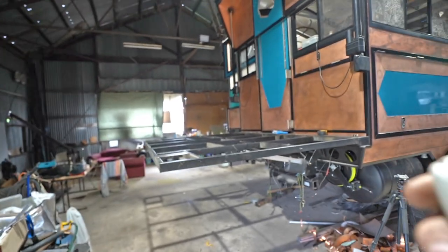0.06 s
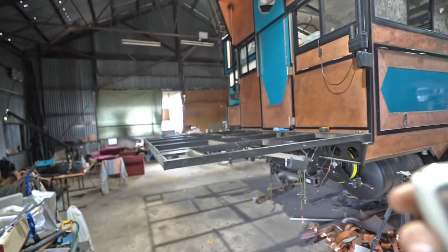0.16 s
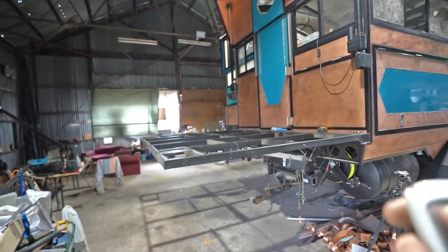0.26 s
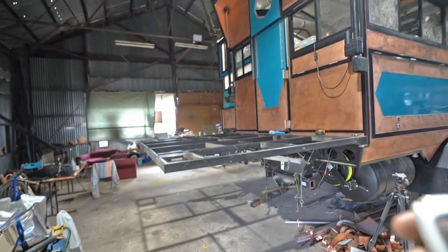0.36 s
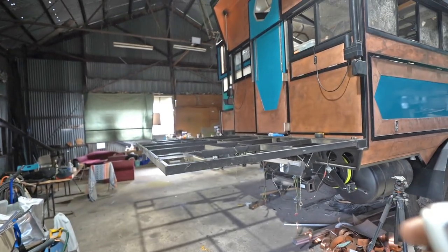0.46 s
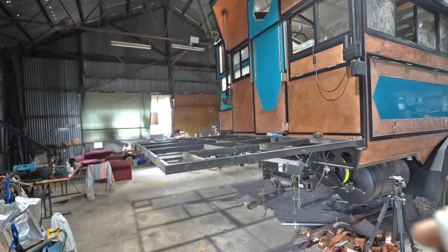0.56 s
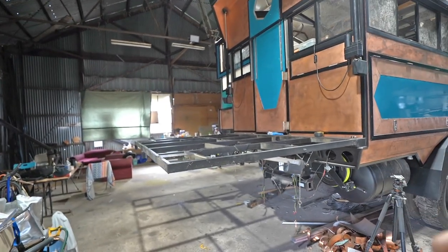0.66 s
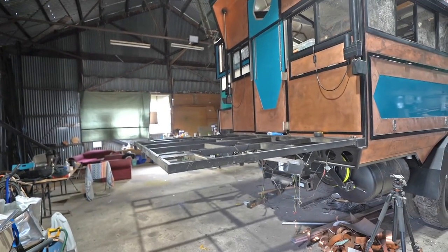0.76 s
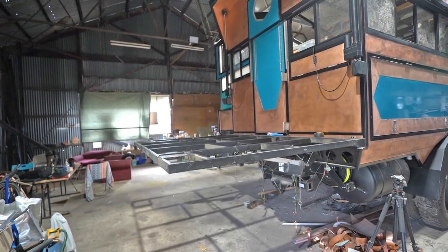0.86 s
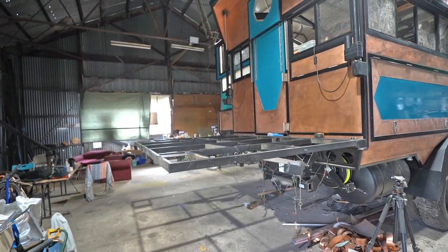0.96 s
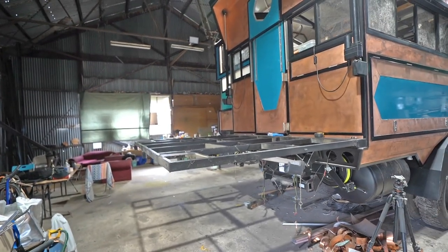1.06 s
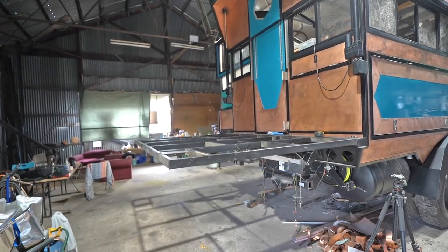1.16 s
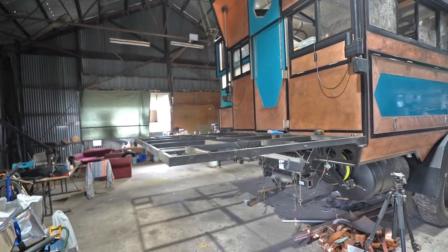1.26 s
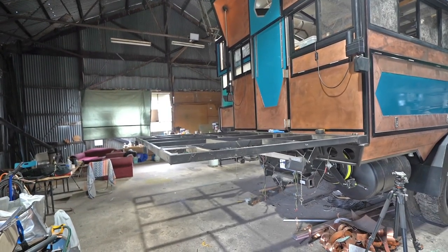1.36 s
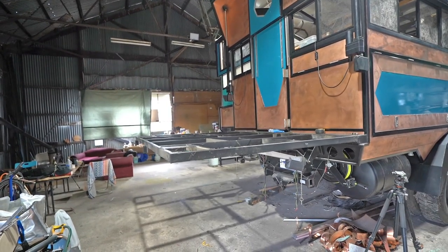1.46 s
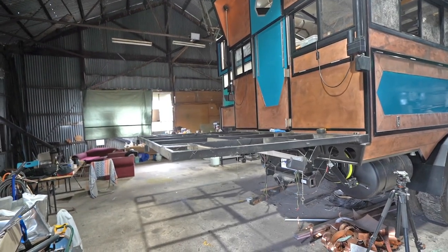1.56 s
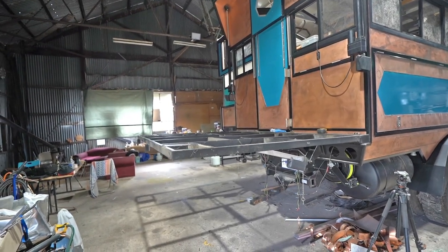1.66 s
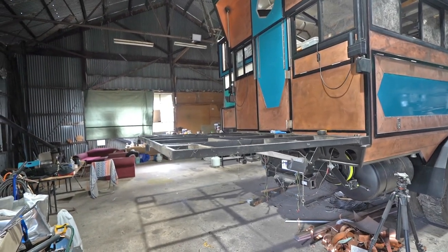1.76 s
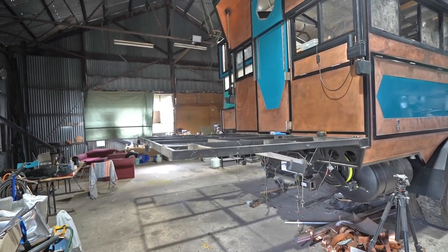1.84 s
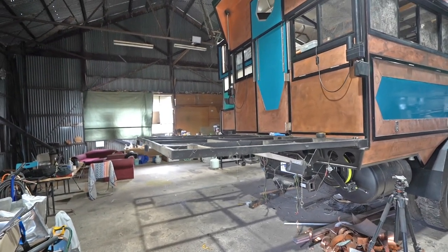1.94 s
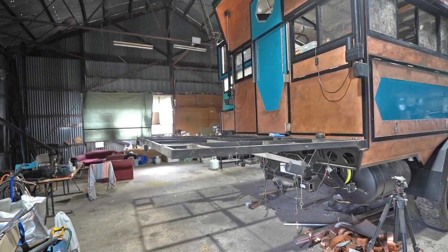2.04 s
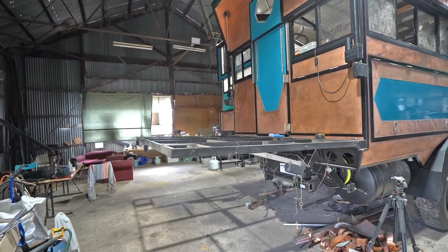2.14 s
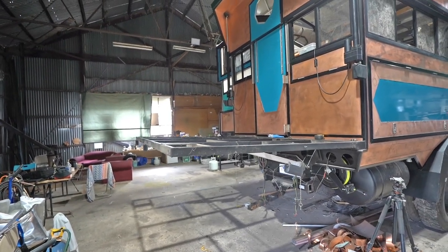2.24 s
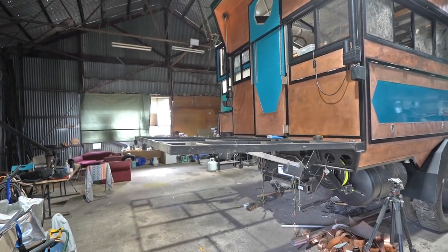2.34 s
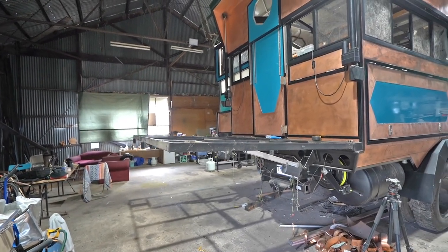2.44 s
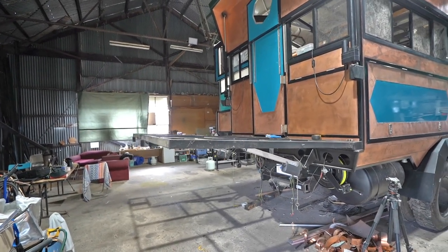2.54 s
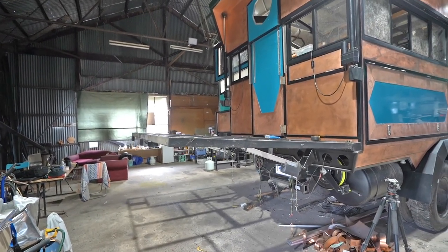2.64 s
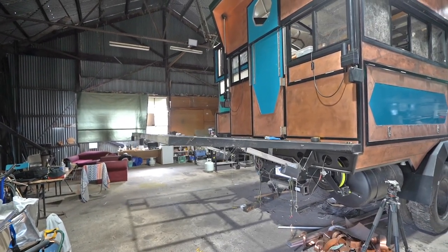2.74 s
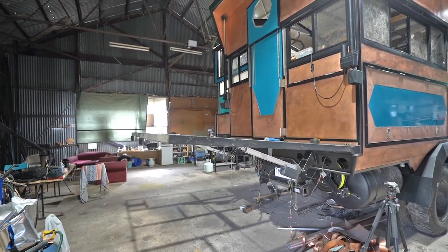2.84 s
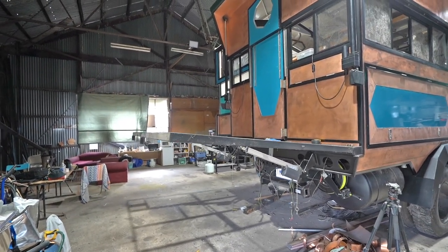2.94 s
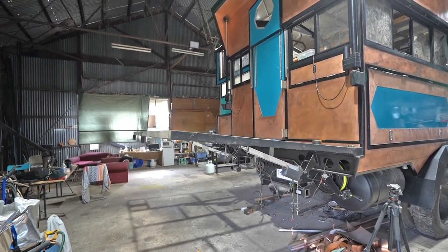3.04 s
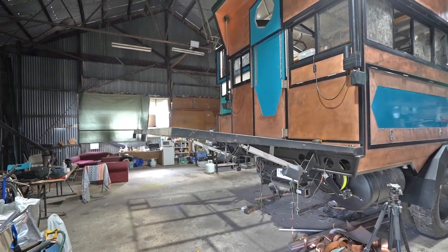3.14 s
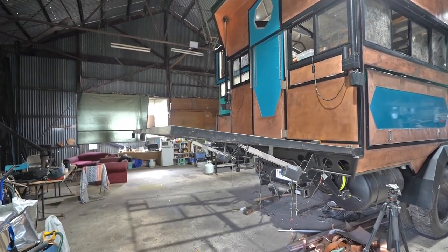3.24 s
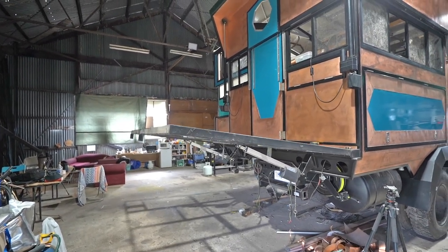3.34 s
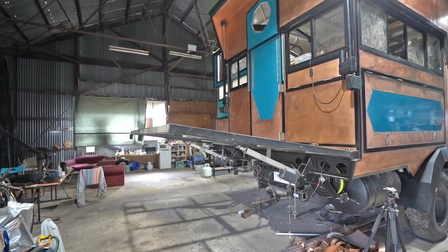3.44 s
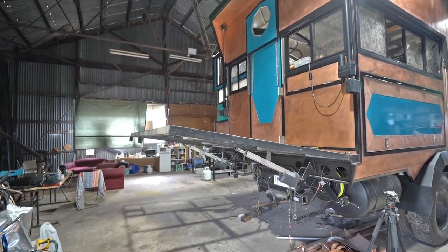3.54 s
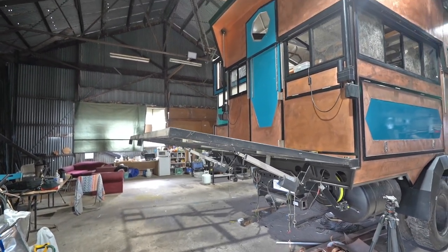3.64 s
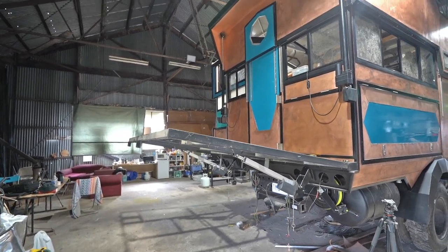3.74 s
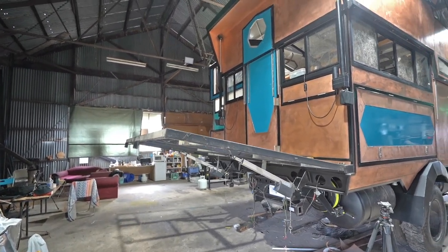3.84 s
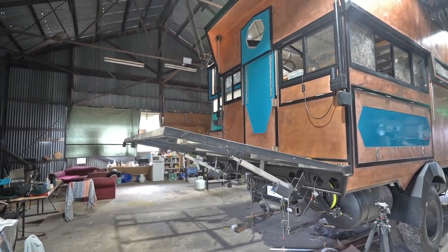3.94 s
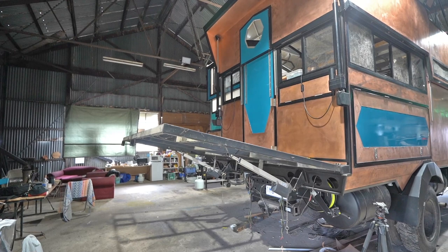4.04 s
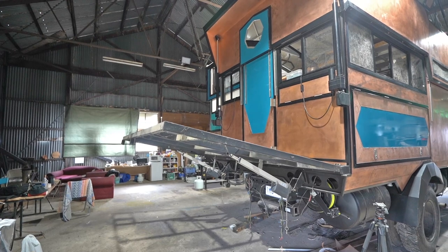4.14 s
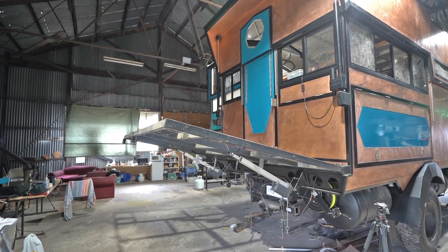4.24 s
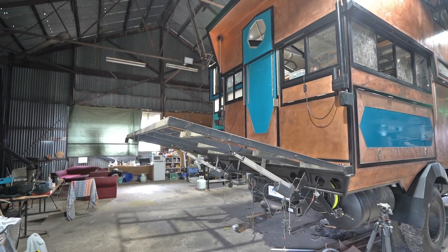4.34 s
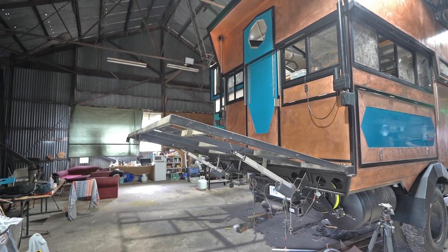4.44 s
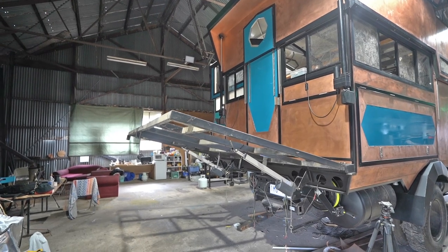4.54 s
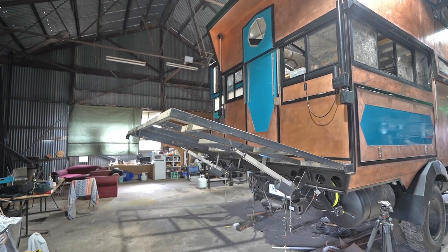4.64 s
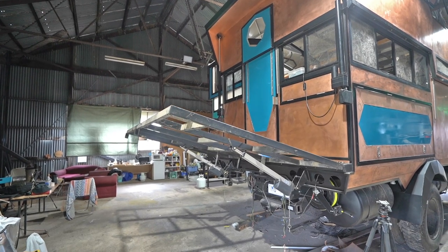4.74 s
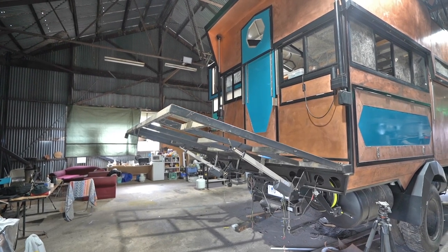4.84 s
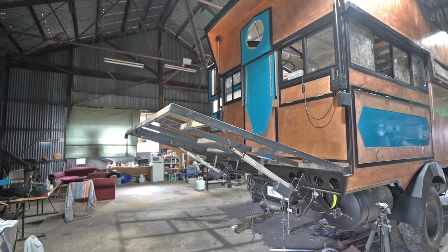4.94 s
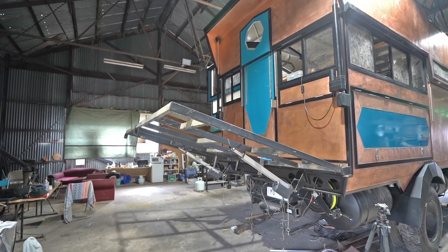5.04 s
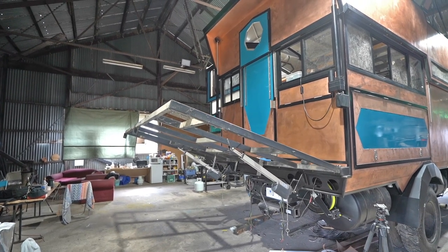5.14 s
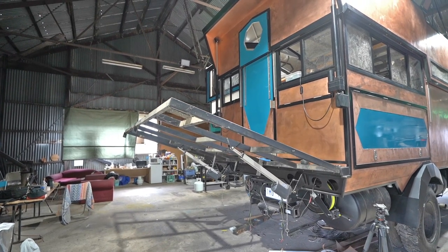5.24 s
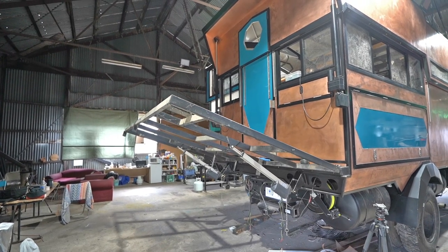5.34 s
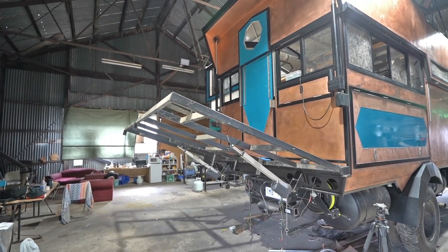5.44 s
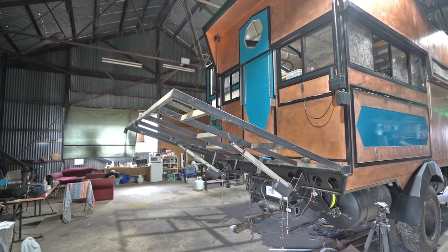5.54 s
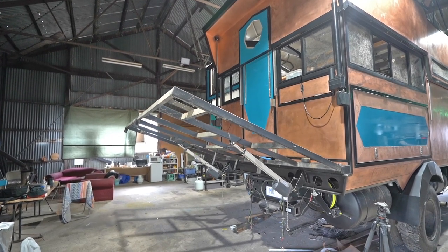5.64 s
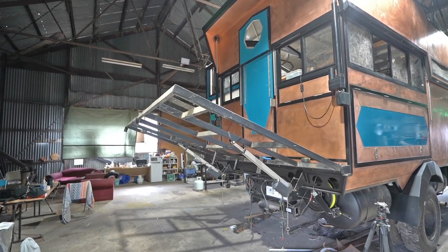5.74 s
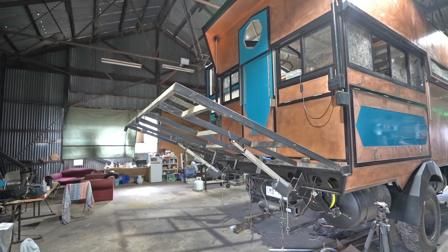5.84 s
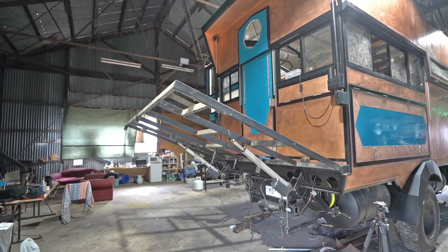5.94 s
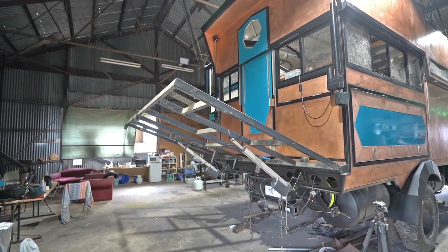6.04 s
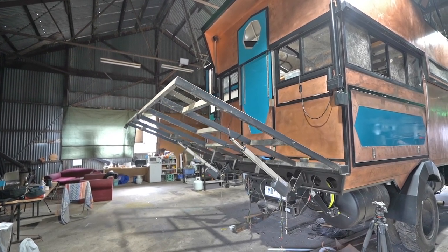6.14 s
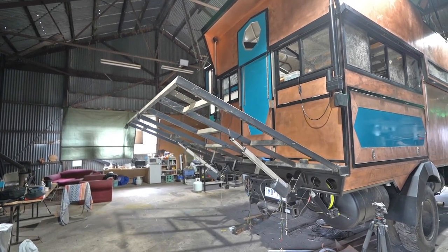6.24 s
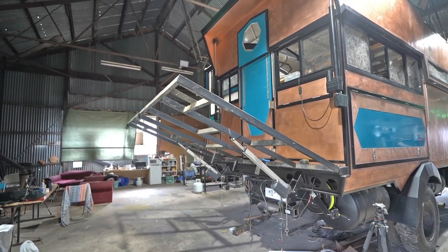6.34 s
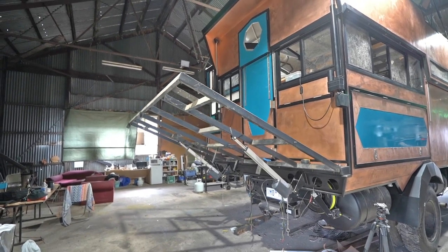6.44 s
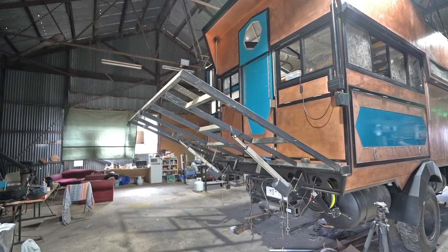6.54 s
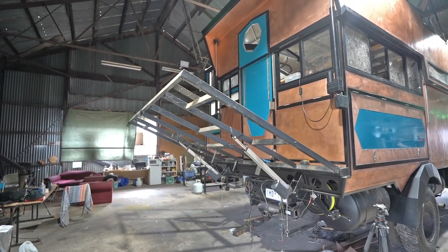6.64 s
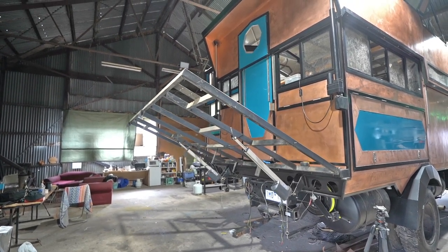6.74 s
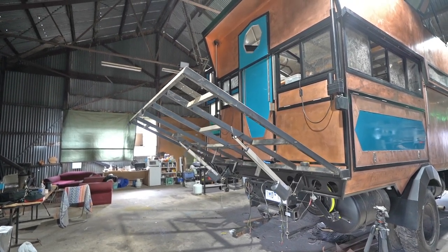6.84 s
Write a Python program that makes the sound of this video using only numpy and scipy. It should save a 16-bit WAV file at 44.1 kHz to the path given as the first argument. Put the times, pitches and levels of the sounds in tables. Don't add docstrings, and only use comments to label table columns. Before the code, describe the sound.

A reverberant tin shed, heard through a band-limited camera microphone. It opens with soft air hush, faint low hum, a distant drone and deep wind rumble; skin rustles lightly on plastic until about 0.5 s. At 0.63 s a sharp button click stands out, followed by tiny snaps at 0.73-0.77, a ringing relay closure at 0.79 and a low knock at 0.85. Two electric screw actuators start immediately, jolting unevenly as their pitch climbs to a steady gear whine near 1.4 s, with dense harmonics, slow beating and brushy rasp. At about 2.25 s playback abruptly doubles in speed: the whine leaps an octave, brighter and throbbing faster, continuing with small swells of effort to the cut at about 6.9 s. Soft low thuds fall near 4.4, 4.5 and 4.7 s, with a fainter one at 6.6. From 4.9 s a faint outside engine sinks in pitch; wind dips, then gusts near 6 s.

```python
import sys
import numpy as np
from scipy import signal
from scipy.fft import rfft, irfft, next_fast_len
from scipy.io import wavfile
from scipy.ndimage import uniform_filter1d, map_coordinates

SR = 44100
rng = np.random.default_rng(int(sys.argv[2]) if len(sys.argv) > 2 else 0)


def unload_wav(signal):
    wavfile.write(
        sys.argv[1],
        SR,
        np.round(np.clip(np.atleast_2d(signal).T, -1, 1) * 32767).astype(np.int16),
    )


def natural_amplitude(level_db):
    exponent = np.asarray(level_db, float) / 20
    return 10 ** exponent


N = 303628

FAST_FROM = 2.245
CUT = round(FAST_FROM * SR)
M = CUT + 2 * (N - CUT)
LIVE = np.arange(M) / SR
SHOWN = np.minimum(LIVE, (LIVE + FAST_FROM) / 2)
TEETH = 106
RATIO = 3


def unit(x):
    return x / np.sqrt(np.mean(x ** 2) + 1e-20)


def along(points, hz):
    f, v = np.transpose(points)
    return np.interp(np.log(hz + 1), np.log(f + 1), v)


def curves(rows):
    s, *cols = np.transpose(rows)
    return [np.interp(SHOWN, s, c) for c in cols]


def wobble(rate):
    return map_coordinates(rng.standard_normal(400), [LIVE * rate], mode="wrap")


def filtered(x, response):
    m = next_fast_len(M + SR // 2)
    return irfft(rfft(x, m) * response(np.fft.rfftfreq(m, 1 / SR)), m)[:M]


def noise(spectrum):
    return unit(filtered(rng.standard_normal(M), lambda hz: natural_amplitude(along(spectrum, hz))))


def place(s):
    return round(max(s, 2 * s - FAST_FROM) * SR)


# (frequency [Hz], level [dB per Hz])
SHED_AIR = [(60, -13), (110, -9.5), (170, -15), (235, -9), (320, -14), (500, -15), (900, -19.5),
            (2000, -32), (6500, -43), (10000, -48.5), (16000, -59)]
# (frequency [Hz], level [dB per Hz])
DRONE = [(25, -40), (45, 1), (60, 2.5), (105, -0.5), (140, -21), (300, -50), (900, -120)]


def room_tone():
    hush_db = -46.5 + 0.24 * SHOWN + 1.4 * wobble(4.6)
    drone_db = -61.5 + 0.94 * SHOWN + 2.4 * wobble(0.84)
    hum = natural_amplitude(-42.5 + 0.2 * wobble(2.16)) * np.sin(2 * np.pi * 93.1 * LIVE)
    return hum + natural_amplitude(drone_db + 3.5) * noise(DRONE) + natural_amplitude(hush_db) * noise(SHED_AIR)


# (time [s], level [dB], half length [s])
GUSTS = [
    (3.9, -5, 0.13),
    (5.6, -4, .2),
    (5.95, 3, .2),
]
# (frequency [Hz], level [dB per Hz])
RUMBLE = [(4, -8), (10, -2), (20, -2), (32, -12.5), (60, -60), (200, -130)]


def buffeting():
    level_db = np.where(LIVE < FAST_FROM, -37 - 2 * LIVE, -42)
    for s, db, half in GUSTS:
        level_db = level_db + db * np.exp(-((SHOWN - s) / half) ** 2)
    return natural_amplitude(level_db - 2.5) * unit(natural_amplitude(1.5 * wobble(6)) * noise(RUMBLE))


# (time [s], level [dB], half length [s])
STIRS = [
    (.02, -56.5, .05),
    (.3, -61, .07),
    (.43, -65, .07),
]
# (frequency [Hz], level [dB per Hz])
RUSTLE = [(300, -22), (1500, -1), (2700, 1), (5000, -4), (8000, -8), (14000, -30)]


def hand():
    stir = sum(natural_amplitude(db) * np.exp(-((LIVE - s) / half) ** 2) for s, db, half in STIRS)
    return stir * natural_amplitude(2.5 * wobble(29)) * noise(RUSTLE)


# (time [s], peak level [dB], ring [Hz], t60 [s], snap [dB])
CLICKS = [
    (0.625, -7.5, 1390, 0.005, -30),
    (.6252, -28, 4200, .006, -24),
    (.7268, -41, 4000, 0.0055, 14),
    (.7715, -38, 3600, 0.0087, 5),
    (.7717, -31, 7400, 0.0072, -8),
    (.785, -17, 2420, 0.034, -35),
    (.7855, -21, 8170, .02, -17),
    (.7855, -44, 4470, .02, -13),
    (.853, -13, 910, .04, -18),
]


def clicks():
    out, t = np.zeros(M + SR), np.arange(SR // 2) / SR
    for s, db, hz, t60, snap_db in CLICKS:
        ring = np.sin(2 * np.pi * hz * t) + natural_amplitude(snap_db) * rng.standard_normal(len(t))
        attack = (1 - np.exp(-8 * t / t60)) ** 2
        out[place(s):][:len(t)] += natural_amplitude(db - 60 * t / t60) * attack * ring
    return out[:M]


RELAY_S = 0.785
# (time [s], rate [turns per s])
CRUISE = [(1.6, 4.937), (3.05, 4.947), (4.05, 4.935), (4.55, 4.917), (6.9, 4.921)]


def speed():
    cruise, = curves(CRUISE)
    ramp = 1.95 + 5.45 * np.clip(LIVE - RELAY_S, 0, 1)
    knee = 30
    rate = (ramp ** -knee + cruise ** -knee) ** (-1 / knee)
    return rate, 20 * np.log10(rate / cruise)


# (time [s], level [dB])
EFFORT = [(1.2, -1.5), (1.9, 0), (2.7, 0), (3.2, 1), (3.75, -1), (4.3, 1.1), (4.7, 0), (5, 1.6), (5.5, -1),
          (6.2, 0), (6.88, -1.6)]
# (time [s], whine gain [dB], rasp gain [dB], fade [s])
JOLTS = [
    (.785, -11, 0.5, 0.024),
    (.852, -1, 15, 0.03),
    (.95, 5, 1.5, .04),
    (1.05, 5, 3, 0.063),
    (1.135, 2.5, -0.5, 0.085),
]


def levels(lag_db):
    effort_db, = curves(EFFORT)
    whine_db = -17.5 + 1.36 * lag_db + effort_db
    rasp_db = -14.5 + 1.7 * lag_db + 0.5 * effort_db
    for s, whine_jump, rasp_jump, fade in JOLTS:
        kick = np.clip((LIVE - s) / 0.0056, 0, 1) * np.exp(-np.clip(LIVE - s, 0, 1) / fade)
        whine_db = whine_db + whine_jump * kick
        rasp_db = rasp_db + rasp_jump * kick
    return whine_db, rasp_db


ORDERS_SUNG = [60, 96, 102, 105, 315, 108, 111, 117, 189, 207, 43.6, 358, 426]
# (level [dB], drift [dB per s], beat depth [dB], loudest at [s], beat length [s])
SUNG = [(-30, -0.55, 2.5, 3.68, 2.97), (-31.5, -0.3, -0.2, 5.1, 4.6), (-21, -0.86, 1.5, 1.7, 3.8),
        (-26.5, 0.02, 2, 1.8, 1.72), (-36, -0.56, 2, 2.8, 1.55), (-28.5, -0.35, 2.5, 2.9, 1.8),
        (-36.5, 1.45, 2, 5.3, 5.2), (-32.5, -0.16, 3, 2.6, 3.4), (-33, -0.17, 3.5, 1.6, 5.2),
        (-20, -2.1, 1, 2.94, 1.87), (-47.5, 0.64, -1.5, 5.35, 1.2), (-39, -2.1, 16, 3.4, 2.6),
        (-47, 3, 1.5, 6.5, 2.4)]


def lines(turns, lag_db):
    out = np.zeros(M)
    for order, (db, drift, depth, s, length) in zip(ORDERS_SUNG, SUNG):
        beat_db = depth * np.cos(2 * np.pi * (SHOWN - s) / length)
        level_db = db + drift * SHOWN + beat_db + 1.8 * lag_db + 1.3 * wobble(3)
        cycles = order * turns + rng.random() + 0.033 * wobble(4.6)
        out += natural_amplitude(level_db) * np.sin(2 * np.pi * cycles)
    return out


# (harmonic [x tooth rate], level [dB], sideband spread [wheel orders])
MESH = [(.99, -2, 8), (1.55, -13.5, 6), (1.77, -11, 7), (2, -5.5, 9), (2.96, -6.5, 9), (3.38, -13.5, 4),
        (3.96, -11, 11), (5, -14, 13), (6, -14.5, 16), (7, -15, 15), (8, -18, 15), (9, -16, 15),
        (10, -25, 10), (12, -32, 18), (13, -24, 18)]
# (frequency [Hz], level [dB])
FRAME = [(100, -30), (200, -22), (300, -2.5), (450, -0.5), (700, -2), (900, 0.5), (1250, -1), (1400, -3),
         (2000, 0.5), (3400, 3), (9000, -8.5)]


def whine(turns, pinion_db, loose):
    order = np.arange(2049)
    hump = sum(natural_amplitude(db) / (1 + ((order - h * TEETH) / spread) ** 2) for h, db, spread in MESH)
    hump = hump * natural_amplitude(pinion_db * (order % RATIO == 0))
    kept = hump * ~np.isin(order, ORDERS_SUNG)
    drift = 2 * np.pi * (0.063 * LIVE + 0.082 * wobble(0.44))
    size = 16384
    repeating = np.zeros(M)
    for share in np.cos(drift), np.sin(drift):
        phase = np.exp(2j * np.pi * rng.random(2049))
        errors = irfft(kept * phase * natural_amplitude(1.96 * rng.standard_normal(2049)), size)
        repeating += share * np.interp(turns % 1 * size, np.arange(size + 1), np.append(errors, errors[0]))
    fine = np.arange(64 * 2048 + 1)
    smooth = np.interp(fine / 64, order, uniform_filter1d(hump, size=3))
    free = irfft(smooth * np.exp(2j * np.pi * rng.random(len(fine))), 64 * size)
    out = unit(repeating) + loose * np.interp(turns * size, np.arange(len(free)), unit(free))
    return unit(filtered(out, lambda hz: natural_amplitude(along(FRAME, hz))))


# (frequency [Hz], level [dB per Hz])
RASP = [(60, -36), (120, -35), (200, -22), (400, -18.5), (520, -7), (720, -16.5), (1030, -10), (1340, -18),
        (1750, -15.5), (3240, -17.5), (4800, -23), (5500, -29), (10500, -51.5), (16000, -64)]
# (frequency [Hz], width [Hz], level [dB])
HOUSING = [(292, 90, 3), (3420, 97, 1.5), (7570, 440, -1), (7920, 620, 2.5), (8570, 1200, 10.5),
           (12050, 520, 6), (13100, 860, 12), (15100, 900, 8)]


def rasp(turns, throb_db, gate, grit):
    pinion_swell = throb_db * np.cos(2 * np.pi * RATIO * turns + 1.74)
    wheel_swell = 0.13 * np.cos(2 * np.pi * turns + 0.48)
    swell = pinion_swell + wheel_swell + 0.96 * wobble(25)
    teeth = 1 + gate * np.cos(2 * np.pi * TEETH * turns)
    grains_db = grit * rng.standard_normal(M // 40 + 1).repeat(40)[:M]
    rough = rng.standard_normal(M) * natural_amplitude(grains_db)

    def colour(f):
        ring = 1 + sum(natural_amplitude(db) / (1 + ((f - c) / w * 2) ** 2) for c, w, db in HOUSING)
        return natural_amplitude(along(RASP, f)) * ring

    def bright(f):
        return f ** 2 / (f ** 2 + 2500 ** 2)

    top = filtered(rough * teeth * natural_amplitude(swell), lambda f: colour(f) * np.sqrt(bright(f)))
    low = filtered(rng.standard_normal(M), lambda f: colour(f) * np.sqrt(1 - bright(f)))
    return unit(top + low)


def actuators():
    strain = 1 + 4 * np.clip((1.4 - LIVE) / .5, 0, 1)
    rate, lag_db = speed()
    turns = np.cumsum(rate) / SR + 0.227 * (LIVE > FAST_FROM)
    twist = strain * (0.00048 * wobble(9) + 0.00015 * wobble(30))
    off_centre = 0.00046 * np.sin(2 * np.pi * turns)
    twisted = turns + twist + off_centre
    whine_db, rasp_db = levels(lag_db)
    screw_swell = 2 * np.cos(2 * np.pi * 4.78 * (LIVE - 6.16))
    pinion_swell = 1.16 * np.cos(2 * np.pi * RATIO * turns + 2.63)
    surge = 0.78 * wobble(5) + screw_swell + pinion_swell
    on = np.clip((LIVE - RELAY_S) / 0.0023, 0, 1)
    gears = natural_amplitude(whine_db - 4.0 + surge) * whine(twisted, pinion_db=4.5, loose=0.93)
    throb_db = 2.6 + 0.48 * SHOWN
    rub = natural_amplitude(rasp_db - 6.5) * rasp(turns, throb_db, gate=0.13, grit=0.92)
    tones = natural_amplitude(whine_db + 17.0) * lines(twisted, lag_db)
    return on * tones, on * (gears + rub)


# (frequency [Hz], t60 [s])
SHED = [(200, 1.78), (2000, 0.55), (10000, 1.09)]


def shed(x):
    hz, t, z = signal.stft(rng.standard_normal(SR), SR, nperseg=256)
    tail = signal.istft(z * natural_amplitude(-60 * t / along(SHED, hz)[:, None]), SR, nperseg=256)[1]
    return signal.fftconvolve(np.pad(x, (500, 0)), tail / np.linalg.norm(tail))[:M]


# (time [s], level [dB], boom [Hz], t60 [s])
THUDS = [
    (4.366, -26.5, 102, 0.91),
    (4.49, -33.5, 128, 0.95),
    (4.719, -30, 39.4, 1),
    (6.63, -36, 66, 0.78),
]


def thuds():
    out, t = np.zeros(M + SR), np.arange(SR // 2) / SR
    for s, db, hz, t60 in THUDS:
        puff = uniform_filter1d(uniform_filter1d(rng.standard_normal(len(t)), size=90), size=60)
        body = 0.5 * np.sin(2 * np.pi * hz * t) + 0.81 * unit(puff)
        out[place(s):][:len(t)] += natural_amplitude(db - 60 * t / t60) * (1 - np.exp(-t / 0.014)) * body
    return out[:M]


def engine():
    since = np.clip(SHOWN - 4.9, 0, None)
    crank = 2 * np.pi * np.cumsum(60.5 - 5.3 * since) / SR
    firing_db = -48 - 24 * np.exp(-since / 0.34) + 1.2 * wobble(1.96)
    octave_db = -75 + 17.6 * since + 1.5 * wobble(1.86)
    return natural_amplitude(firing_db) * np.sin(crank) + natural_amplitude(octave_db) * np.sin(2 * crank)


def scene():
    around = room_tone() + buffeting() + hand() + engine()
    tones, drive = actuators()
    live = around + clicks() + tones + drive + natural_amplitude(-5.5) * shed(drive) + thuds()
    fast = filtered(live, lambda hz: hz < SR / 4)[CUT::2]
    return np.append(live[:CUT], fast)[None]


def top_cut(x):
    return signal.sosfilt(signal.butter(12, 17110, fs=SR, output="sos"), x)


def record(dry):
    m = next_fast_len(N + SR)
    edge = np.clip((15780 - np.fft.rfftfreq(m, 1 / SR)) / 120, 0, 1)
    mix = irfft(rfft(dry, m) * np.sin(np.pi / 2 * edge) ** 2, m)[:, :N]
    return top_cut(mix)


dry = scene()
out = record(dry)
unload_wav(out)
```